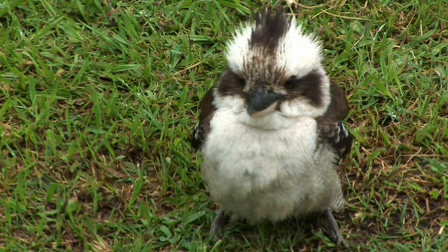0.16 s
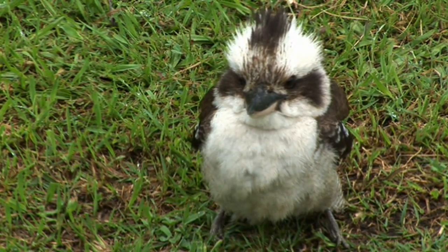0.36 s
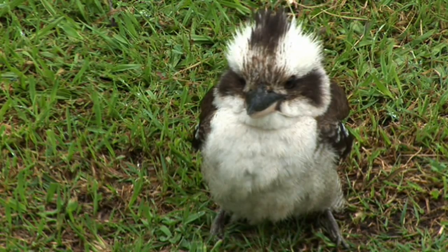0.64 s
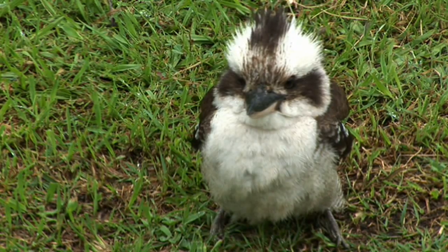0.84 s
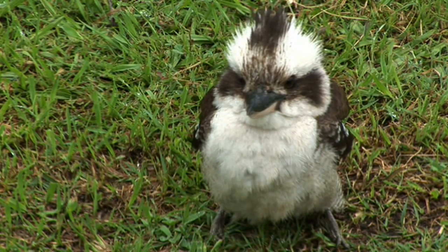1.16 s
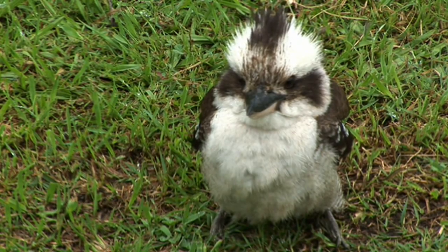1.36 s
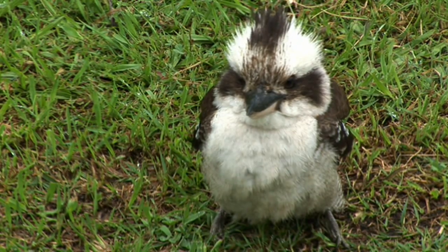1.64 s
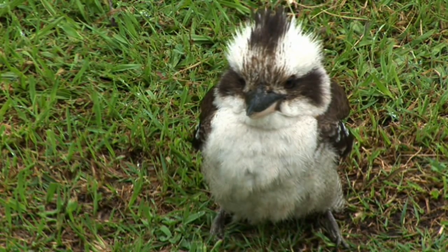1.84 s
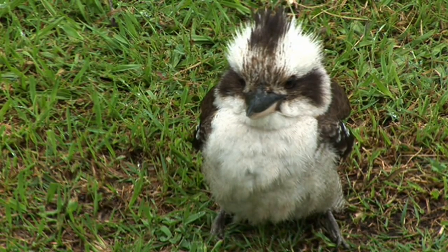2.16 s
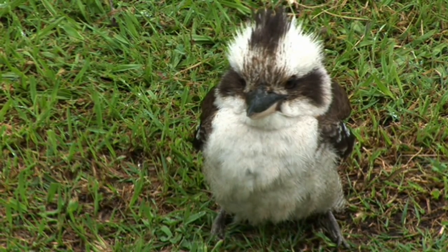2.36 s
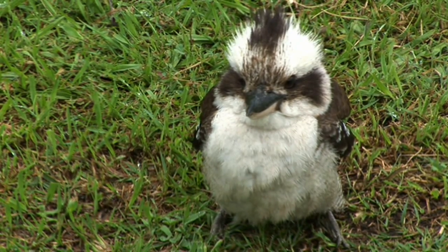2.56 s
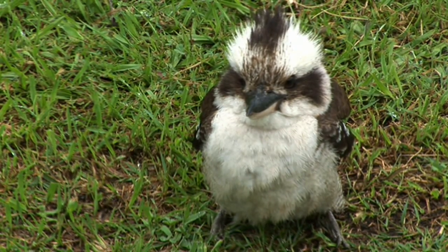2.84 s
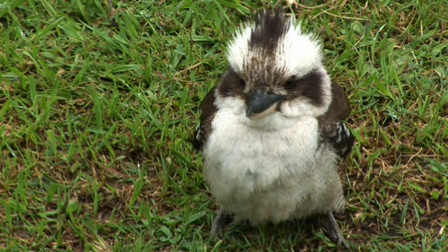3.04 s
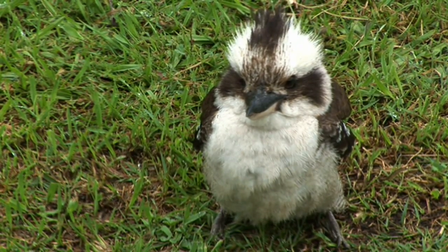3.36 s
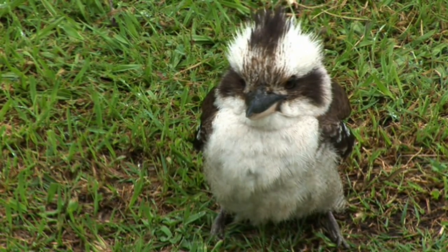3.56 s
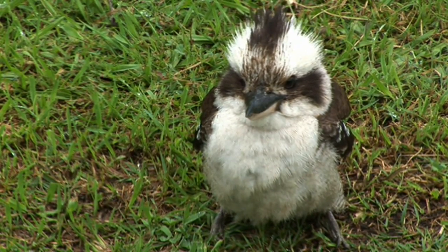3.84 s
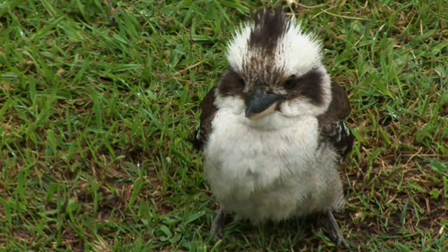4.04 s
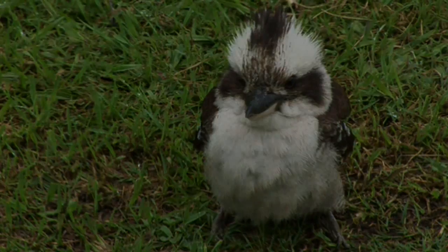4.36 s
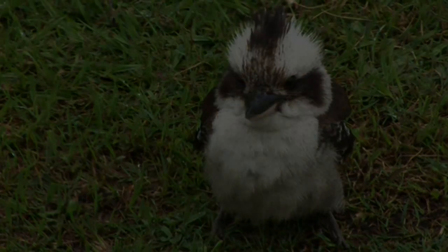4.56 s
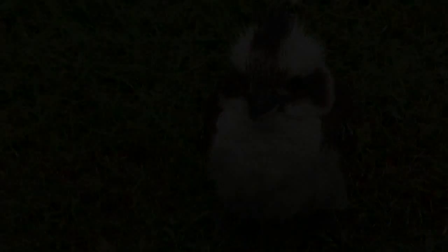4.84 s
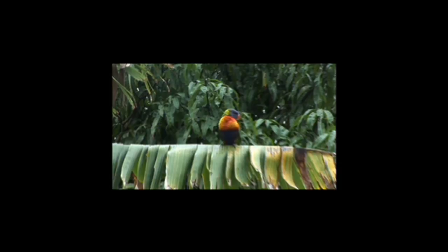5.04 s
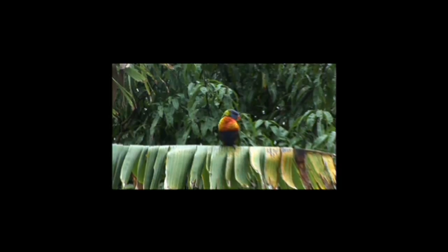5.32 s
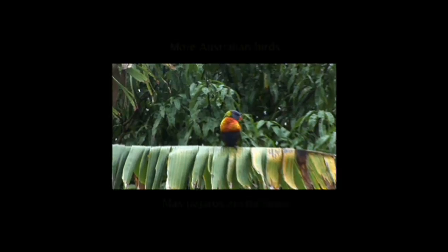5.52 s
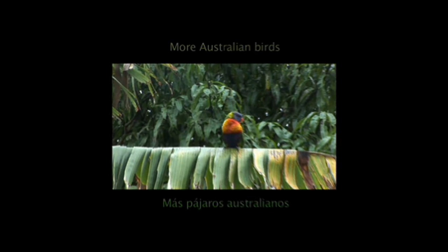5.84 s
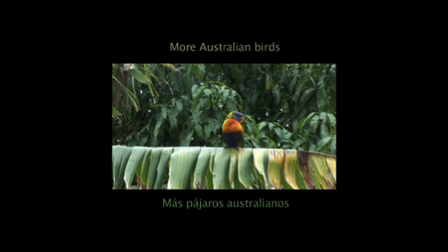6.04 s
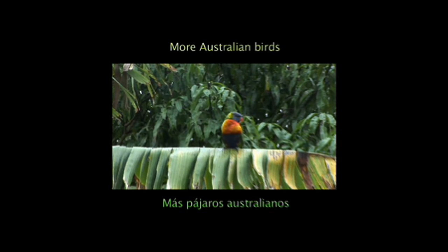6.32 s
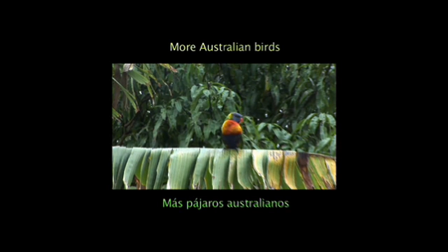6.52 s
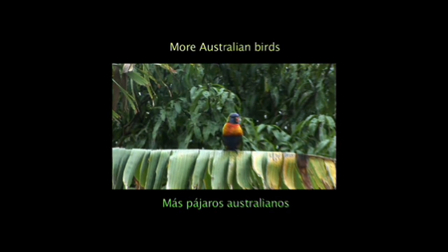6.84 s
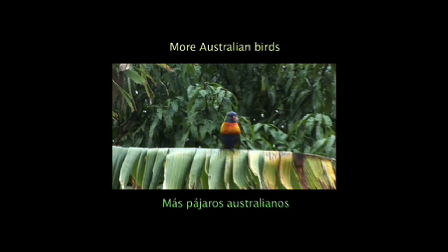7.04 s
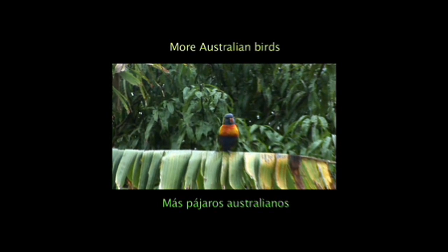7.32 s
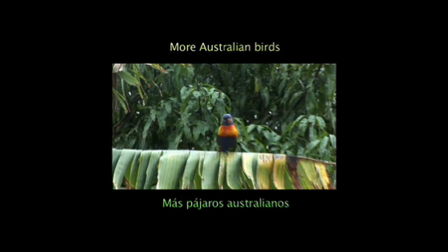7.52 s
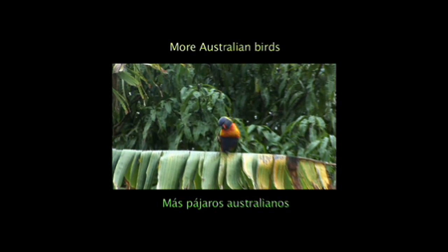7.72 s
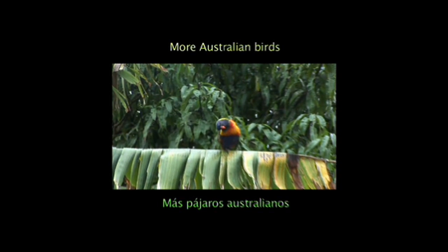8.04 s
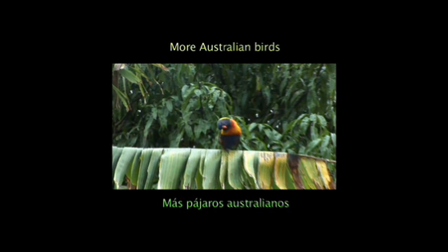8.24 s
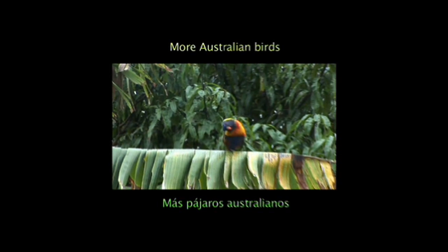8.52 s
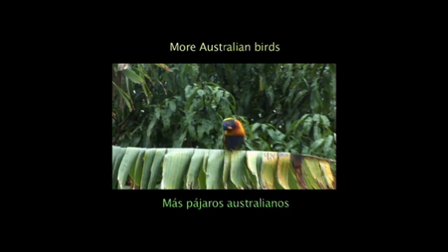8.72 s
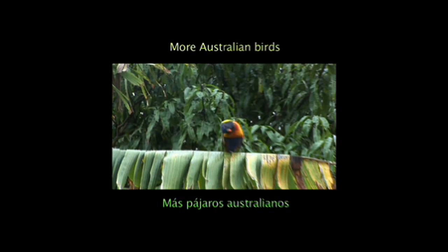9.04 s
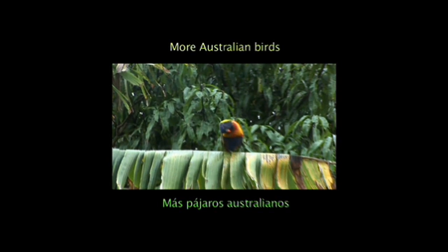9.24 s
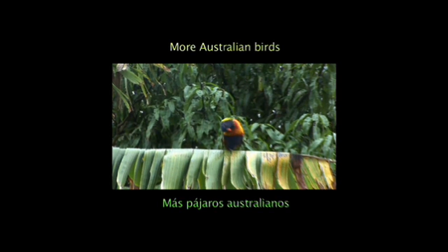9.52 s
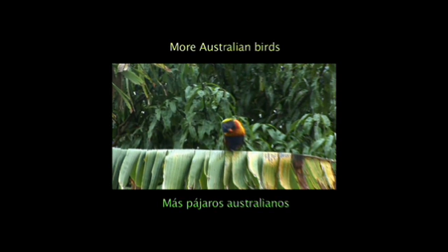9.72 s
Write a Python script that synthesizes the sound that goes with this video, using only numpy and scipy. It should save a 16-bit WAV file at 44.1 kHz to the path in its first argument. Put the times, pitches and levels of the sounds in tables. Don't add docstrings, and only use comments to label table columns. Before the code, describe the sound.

Outdoors on a lawn, small songbirds chip, peep and whistle in distant, echoing trees over a soft traffic hum. At about five seconds the place switches abruptly to a louder garden, where small parrots chatter and screech close to the microphone. Other birds whistle beyond, a crow caws far off, wings flutter past near nine seconds, and piercing cries finish it.

```python
import sys
import numpy as np
from scipy import signal
from scipy.io import wavfile
from scipy.ndimage import uniform_filter1d

SR = 44100
rng = np.random.default_rng(int(sys.argv[2]) if len(sys.argv) > 2 else 0)


def to_wav(s):
    ch = np.atleast_2d(s).T
    pcm = np.round(np.clip(ch, -1, 1) * 32767)
    wavfile.write(sys.argv[1], SR, pcm.astype(np.int16))


def level_to_linear(level):
    exponent = np.asarray(level, float) / 20
    return 10 ** exponent


N = 435708
SCENE_CHANGE_S = 4.984

# frequency in Hz, density in dB per Hz.
LAWN_AIR = [(12, -46), (20, -19), (93, -3), (373, -20), (566, -17), (688, -19), (989, -13.5), (1140, -8),
            (1460, -19.5), (2350, -14.5), (2850, -16), (3980, -21), (6220, -35.5), (14300, -35.5),
            (15600, -41)]
GARDEN_AIR = [(12, -44), (20, 4), (93, 1), (171, -1), (616, -20), (1270, -11.5), (1980, -19), (2350, -11),
              (2700, -13.5), (3280, -12.5), (4580, -24), (4980, -19), (6950, -37.5), (14300, -36),
              (15600, -40)]
# frequency in Hz, width in Hz, level in dB.
LAWN_HUMS = [(92.5, 28, -50), (147.5, 17.5, -62), (570, 19, -68), (1146, 82, -61)]
GARDEN_HUMS = [(98, 19.4, -46), (154.6, 17.5, -53)]
# frequency in Hz, 60 dB decay time in seconds.
TREE_DECAY = [(500, 0.33), (3000, 0.46), (6000, 0.51), (12000, 0.44)]

UPPER_PARTIALS_DB = [-11.5, -17, -33]
# frequency in Hz, gain in dB.
UPPER_COLOUR = [(5000, -5), (7600, -24), (10500, -2), (13500, 3)]

# start in seconds, top in Hz, held pitch in Hz, level in dB.
CHIP_CALLS = [(.18, 5070, 4130, -59.5), (.255, 5200, 3490, -58.5), (.495, 5350, 4050, -54.5),
              (.735, 5620, 3870, -52), (1.415, 5100, 3960, -51), (1.86, 4700, 3890, -52),
              (2.325, 4500, 3540, -51.5), (2.885, 5280, 3870, -56), (3.315, 4420, 3326, -52.5),
              (3.54, 5040, 3340, -53), (4.055, 4590, 3363, -53.5), (4.31, 4770, 3580, -54),
              (4.775, 5230, 3830, -53.5)]
# start in seconds, top in Hz, bottom in Hz, level in dB.
BARE_CHIPS = [(.455, 6100, 4700, -62), (1.165, 5350, 3000, -55), (1.66, 5400, 3420, -55),
              (2.05, 4400, 3110, -52), (3.091, 5280, 3520, -56.5), (3.361, 4630, 3720, -50),
              (3.869, 4920, 3260, -57), (4.295, 5880, 4640, -58.5), (4.4, 4500, 3650, -52)]
# start in seconds, length in seconds, pitch in Hz, level in dB.
PEEPS = [(.46, 0.034, 4230, -57), (.81, .11, 4200, -50), (.9, .13, 4110, -58), (.94, 0.062, 4580, -62),
         (.96, .094, 3950, -56.5), (1.41, 0.039, 5000, -55), (1.47, 0.11, 4240, -56),
         (1.55, 0.053, 3994, -49.5), (1.66, 0.05, 5170, -60), (1.73, 0.04, 3990, -48),
         (1.85, 0.034, 4670, -57), (2.03, 0.034, 4810, -57), (2.12, 0.052, 3780, -55.5),
         (2.31, 0.053, 5090, -55), (2.4, 0.096, 3805, -52.5), (2.47, .098, 4375, -55),
         (3.14, 0.064, 4170, -61), (3.87, 0.038, 4900, -60), (3.58, .095, 4140, -58),
         (3.93, 0.049, 4050, -54.5), (4.87, 0.087, 3990, -53), (3.4, .03, 3980, -51), (3.33, .1, 4300, -58),
         (4.42, .06, 4000, -55), (3.66, .08, 3400, -56), (.75, .03, 3900, -52)]
# start in seconds, length in seconds, pitch in Hz, level in dB.
LAWN_HELD = [(0, 0.027, 2964, -50.5), (.54, .09, 3020, -57), (.63, .1, 3010, -50), (.47, .04, 2480, -59),
             (.74, .05, 2450, -59), (2.235, .03, 2020, -53), (2.42, .02, 2300, -55), (4.53, .04, 2720, -57),
             (4.28, .02, 2500, -55), (.56, .12, 3230, -60), (.62, 0.045, 2470, -58),
             (.89, 0.044, 2495, -57.5), (1, 0.037, 1673, -58.5), (1.03, .044, 2440, -57.5),
             (1.13, 0.4, 2090, -62), (1.57, 0.3, 1732, -59), (1.66, 0.047, 1295, -51),
             (1.62, 0.29, 877, -57.5), (2.25, 0.021, 2647, -49.5), (2.36, 0.046, 1436, -51.5),
             (2.49, 0.14, 3125, -48), (3.78, 0.027, 3125, -54), (3.97, 0.07, 2335, -58.5),
             (4.08, 0.073, 2515, -55), (4.48, 0.022, 1594, -52.5), (4.605, .02, 3050, -51),
             (4.641, .04, 3080, -48), (4.7, .015, 3050, -48), (4.87, 0.074, 1615, -51)]
# start in seconds, length
# in seconds, first pitch in Hz, level in dB.
LAWN_DROOPS = [
    (1.5, 0.79, 2077, -60),
    (1.8, 0.35, 1420, -58.5),
    (2.25, 0.415, 847, -59.5),
    (2.26, 0.23, 1700, -54),
]
# start in seconds, length in seconds, top in Hz, level in dB.
LAWN_SWOOPS = [(.55, 0.08, 2490, -58), (2.39, .034, 3100, -57), (2.55, .11, 3096, -47.5),
               (2.94, .022, 3000, -47.5), (3.08, .022, 2900, -50.5), (3.44, 0.063, 2400, -59.5),
               (3.63, 0.096, 2784, -56.5), (4.7, 0.11, 3000, -46)]

# start in seconds, length in seconds, pitch in Hz, level in dB.
GARDEN_HELD = [(5.245, .045, 1420, -51), (5.32, .035, 1500, -51), (5.03, .17, 590, -55),
               (7.02, .2, 760, -58), (5.75, 0.012, 1460, -43.5), (7.01, 0.045, 1960, -42),
               (7.06, .07, 1950, -49), (7.16, 0.028, 1470, -46), (6.4, .025, 1660, -47),
               (6.8, .06, 3180, -52), (7.075, .012, 1400, -45), (8.41, .04, 1690, -49),
               (6.21, .035, 1500, -48), (7.2, 0.076, 1966, -43.5), (7.85, .2, 1292, -49.5),
               (8.54, 0.074, 1370, -48.5), (8.75, 0.085, 1410, -48.5), (9.37, .025, 3230, -47),
               (9.45, .04, 4270, -50)]
# time in seconds, pitch in Hz, level in dB.
GARDEN_SLIDES = [
    [(5, 1230, -52), (5.1, 1240, -53), (5.15, 1300, -49), (5.19, 1450, -52)],
    [(9.41, 1680, -48), (9.435, 1800, -50), (9.465, 2060, -48)],
    [(8.84, 1330, -54), (8.9, 1160, -54)],
]
# start in seconds, length in seconds, top in Hz, level in dB.
GARDEN_SWOOPS = [(8.15, .053, 2650, -45), (8.7, .076, 2600, -52.5), (8.96, .089, 2550, -43.5),
                 (9.49, .075, 2450, -41.5)]
# time in seconds, pitch in Hz, level in dB.
CROW_CURVE = [
    (7.38, 719, -50.5),
    (7.622, 708, -50),
    (7.649, 674, -49.5),
    (7.8, 730, -46.5),
    (7.978, 715.3, -50.5),
    (8.52, 634.4, -53.5),
]
CROW_PARTIALS_DB = [-3.5, 4, 5]

# start in seconds, hiss in dB, thump in dB against the hiss, rise in seconds.
FLAPS = [(4.9189, -47.5, 15, 0.018), (8.8925, -35, -1, 0.011), (8.9518, -33, 5.5, 0.014),
         (9.0166, -33.5, -1, 0.017), (9.0843, -38.5, 8.5, 0.014), (9.1544, -47.5, 14.5, 0.013),
         (8.82, -44, -9, .006), (8.85, -45, -9, .006), (8.878, -43, -9, .004), (8.94, -41, -9, .003),
         (9.074, -39, -9, .003), (9.115, -44, -9, .02)]

# start in seconds, length in seconds, first pitch in Hz, level in dB.
CONTACT_CALLS = [
    (5.504, 0.047, 2226, -38.5),
    (6.009, .06, 2050, -30.5),
    (6.662, 0.044, 2350, -36.5),
    (9.058, .048, 2100, -35),
]
# start in seconds, length in seconds, first pitch in Hz, level in dB,
# second partial against the first in dB.
PARROT_SLURS = [(5.065, .022, 2530, -36.5, -9), (5.25, .04, 2850, -42, -25), (5.745, .018, 2650, -44, -24),
                (5.838, .01, 3050, -40, -14), (6.382, 0.058, 2566, -36.5, -23),
                (6.618, 0.026, 2374, -37.5, -21), (6.85, 0.02, 4300, -47, -36),
                (7.734, .015, 4400, -43, -23), (8.342, .012, 4230, -44, -36), (9.58, .008, 3400, -33, -20),
                (9.553, .018, 1800, -43, -30)]
PARROT_LEAPS = [(7.365, 0.024, 2450, -35, -27)]
PARROT_DIPS = [(9.39, .022, 2900, -43, -30), (8.352, .02, 4400, -50, -30), (5.48, 0.026, 2800, -53, -30)]
PARROT_HELD = [(5.015, .05, 2460, -36.5, -14), (5.1, .1, 2480, -43.5, -28), (5.545, 0.04, 3640, -42, -19),
               (5, .015, 3300, -44, -30), (5.795, 0.043, 2710, -34, -25), (6.068, 0.021, 4830, -28.5, -26),
               (6.066, .014, 3320, -31, -15), (6.34, 0.06, 2330, -42, -21), (6.48, 0.03, 3190, -44, -32),
               (6.513, .017, 3170, -37, -32), (5.772, .022, 2350, -34, -34), (5.85, .045, 3750, -47, -24),
               (6.703, .01, 3800, -35, -15), (6.675, .02, 3820, -47, -30), (8.37, .08, 2400, -47, -20),
               (9.31, .03, 3930, -44, -30), (9.625, .028, 2400, -33, -30), (9.572, .02, 3700, -42, -15),
               (7.355, .012, 2450, -36, -25), (7.66, .045, 2900, -45, -13), (7.86, 0.037, 3530, -40.5, -30),
               (7.935, .022, 2176, -32, -30), (9.6, 0.034, 3920, -37, -30), (9.7, 0.049, 4120, -30.5, -24),
               (9.74, 0.018, 3430, -30, -20.5)]
# start in seconds, length in seconds, first pitch in Hz,
# level in dB, second partial against the first in dB.
SQUAWKS = [(5.025, 0.041, 4410, -42.5, -20), (5.15, 0.075, 5210, -46.5, -20), (6.43, 0.03, 2413, -39.5, 1),
           (6.52, 0.031, 2430, -36, -5.5), (6.9, 0.076, 3520, -53, -35), (6.9, .08, 1780, -44, -15),
           (6.9, .04, 2200, -47, -20), (6.95, .03, 2150, -43, -20), (5.255, .06, 3600, -48, -25),
           (5.63, .07, 4080, -48, -30), (5.27, .07, 2830, -48, -25), (6.53, .07, 5000, -45, -30),
           (6.75, .1, 2650, -50, -25), (6.725, .15, 1650, -44, -35), (6.725, .14, 1440, -46, -35),
           (7.25, .12, 1900, -46, -30), (7.01, .17, 980, -56, -4), (8.36, .06, 3900, -52, -30),
           (8.56, .04, 4100, -51, -30), (9.4, .07, 3500, -49, -30), (9.18, .015, 5000, -45, -30),
           (7.81, .08, 5150, -45, -30), (7.18, 0.21, 2443, -41, -15), (7.25, 0.13, 900, -54, 5),
           (7.82, 0.094, 2790, -31.5, -18), (7.965, 0.028, 2560, -30, -19), (8.02, .05, 2638, -33.5, -19),
           (8.99, .06, 2800, -41, -20), (9.25, 0.07, 2050, -47, -12), (9.11, 0.099, 4550, -46, -33),
           (9.3, 0.07, 2700, -44, -13), (9.335, 0.05, 4150, -42, -32)]
RISING_SQUAWKS = [(5.61, .075, 1850, -44, -10), (7.22, 0.07, 2200, -36, -15), (8, .07, 3360, -43, -27),
                  (8.53, 0.074, 2430, -41, -6)]
# start in seconds, length in seconds, pitch in Hz, level in dB.
PARROT_SHRILL = [(8.42, .02, 2480, -53), (8.445, 0.132, 2412, -47), (8.46, 0.065, 2853, -54),
                 (8.55, 0.068, 3030, -57)]
# time in seconds, pitch in Hz, level in dB.
SHRILL_CRIES = [
    [(5, 2760, -46), (5.014, 2600, -40), (5.035, 2640, -47)],
    [(5.055, 2850, -46), (5.075, 2900, -49), (5.12, 3030, -49), (5.155, 2930, -49), (5.185, 3070, -48),
     (5.23, 3050, -56)],
    [(6.415, 2930, -57), (6.445, 2950, -60), (6.462, 2900, -50), (6.485, 2920, -58), (6.56, 2900, -60)],
    [(6.41, 2520, -56), (6.435, 2440, -52), (6.45, 2370, -46), (6.475, 2380, -58), (6.5, 2410, -46),
     (6.525, 2470, -46), (6.535, 2400, -48)],
    [(6.545, 3030, -53), (6.575, 3100, -54), (6.6, 3090, -61), (6.66, 3080, -62)],
]
# time in seconds, pitch in Hz, level in dB.
CRIES = [
    [(5.107, 2820, -43), (5.21, 2870, -36.5), (5.262, 3420, -36)],
    [(5.872, 3290, -35), (5.886, 2654, -35), (5.9, 2760, -33), (5.92, 3230, -28.5), (5.945, 3130, -32.5),
     (6.03, 3550, -30)],
    [(7.699, 2316, -26), (7.722, 2750, -26.5), (7.755, 2480, -20.5), (7.78, 2347, -21.5),
     (7.815, 2740, -24.5)],
    [(8.055, 2557, -29), (8.08, 3090, -30.5), (8.115, 3030, -26), (8.135, 3100, -29), (8.155, 3450, -32)],
    [(8.165, 3280, -33), (8.2, 3520, -36)],
    [(7.792, 4900, -40), (7.81, 5300, -35)],
    [(7.878, 3320, -31), (7.903, 3200, -23), (7.93, 2980, -29), (7.95, 3220, -32)],
    [(9.593, 2456, -17), (9.598, 3000, -19.5), (9.606, 2683, -20), (9.63, 2930, -17.5),
     (9.654, 3080, -16.5)],
    [(9.593, 4900, -29), (9.598, 6000, -33), (9.606, 5370, -29), (9.63, 5860, -32), (9.654, 6160, -35)],
    [(9.657, 4126, -27), (9.693, 4146, -20)],
    [(9.696, 3150, -16), (9.733, 3360, -22.5)],
]
CRY_SECOND_DB = [-24, -29, -27, -25, -27, -29, -23, -19, -45, -27, -25]

PEEP_SAG, HELD_SAG, FAR_HELD_SAG, DROOP, SWOOP = 0.95, 0.988, 0.97, .935, .61
SLUR, LEAP, DIP, CREEP = 1.17, 1.75, .89, 1.025


def evened(x):
    return x / np.sqrt(np.mean(x ** 2) + 1e-20)


def read(points, hz):
    f, value = np.transpose(points)
    return np.interp(np.log(hz + 1), np.log(f + 1), value)


def add(mix, s, sound):
    part = mix[round(s * SR):][:len(sound)]
    part += sound[:len(part)]


def smooth_noise(count, size):
    once = uniform_filter1d(rng.standard_normal((2, count)), size=size)
    return evened(uniform_filter1d(once, size=size))


def band(hz, width, count):
    r = np.exp(-np.pi * width / SR)
    noise = rng.standard_normal(count) + 1j * rng.standard_normal(count)
    slow = signal.lfilter([1], [1, -2 * r, r * r], noise)
    carrier = np.exp(2j * np.pi * hz * np.arange(count) / SR)
    return evened((slow * carrier).real)


def echo(x, wet_db, stretch):
    taps = np.zeros(SR)
    at = np.arange(160, SR - 20, 20)
    taps[at + rng.integers(0, 20, len(at))] = rng.choice([-1., 1.], len(at))
    hz, t, z = signal.stft(taps, SR, nperseg=256)
    t60 = stretch * read(TREE_DECAY, hz)[:, None]
    tail = signal.istft(z * level_to_linear(-60 * t / t60), SR, nperseg=256)[1]
    return x + level_to_linear(wet_db) * signal.fftconvolve(x, tail / np.linalg.norm(tail))[:N]


def whistles(notes, warble, flutter_db, rasp, hoarse, edge_s):
    out = np.zeros(N)
    chance = rng.random((len(notes), 2, 2, 8))
    grit = smooth_noise(N + SR, 40)
    for (points, *second_db), draw in zip(notes, chance):
        at, pitch_hz, level_db = np.transpose(points)
        s, length = at[0], at[-1] - at[0]
        t = np.arange(round((length + edge_s) * SR)) / SR
        clock = s - edge_s / 2 + t
        rate_hz, phase = 25 * 9 ** draw[:, 0, :, None], draw[:, 1, :, None]
        waver, shake = np.sin(2 * np.pi * (rate_hz * t + phase)).sum(1) / 2
        jitter, shimmer = grit[:, round(s * SR):][:, :len(t)]
        db = np.interp(clock, at, level_db) + flutter_db * shake
        hz = np.interp(clock, at, pitch_hz) * (1 + warble * waver + hoarse * jitter)
        turn = 2 * np.pi * np.cumsum(hz) / SR
        tone = np.sin(turn)
        if second_db:
            tone += level_to_linear(second_db[0]) * np.sin(2 * turn)
            onset = np.minimum(t / .006, 1)
            for k, part_db in enumerate(UPPER_PARTIALS_DB, 3):
                gain = level_to_linear(0.66 * second_db[0] + part_db + read(UPPER_COLOUR, k * hz))
                gain = gain * (k * hz < SR / 2) * onset
                come_and_go = 1 + 1.04 * np.roll(jitter, 90 * k)
                tone += gain * np.sin(k * turn) * come_and_go
        fade = np.clip(np.minimum(t, t[-1] - t) / edge_s, 0, 1)
        note = np.sqrt(2) * level_to_linear(db) * tone * (1 + rasp * shimmer) * fade
        add(out, max(s - edge_s / 2, 0), note)
    return out


def glides(rows, ratio, *second_db):
    return [([(s, hz, db), (s + length, hz * ratio, db)], *rest, *second_db)
            for s, length, hz, db, *rest in rows]


def air(colour, db, hums, patchy_db):
    frames, hz = N // 256 + 5, np.fft.rfftfreq(1024, 1 / SR)
    a, b, patches = rng.standard_normal((frames, 513, 3)).T
    patches = uniform_filter1d(patches, size=14, axis=0)
    patches = evened(uniform_filter1d(patches, size=16, axis=1))
    z = (a + 1j * b) * level_to_linear(read(colour, hz)[:, None] + patchy_db * patches)
    wash = signal.istft(z, nperseg=1024, noverlap=768)[1][:N]
    machines = sum(level_to_linear(hum_db) * band(f, width, N) for f, width, hum_db in hums)
    return level_to_linear(db) * evened(wash) + machines


def chip_calls():
    chip_s, hold_s = .027, 0.0633
    calls = [([(s, top_hz, db), (s + chip_s, hz, db)],) for s, top_hz, hz, db in BARE_CHIPS]
    for s, top_hz, hz, db in CHIP_CALLS:
        landing = s + chip_s
        calls.append(([(s, top_hz, db - 6.5), (landing, hz, db), (landing + hold_s, 0.99 * hz, db)],))
    return calls


def songbirds():
    small = chip_calls() + glides(PEEPS, PEEP_SAG)
    large = glides(LAWN_HELD, HELD_SAG) + glides(LAWN_DROOPS, DROOP) + glides(LAWN_SWOOPS, SWOOP)
    chirps = whistles(small, warble=.012, flutter_db=3, rasp=.3, hoarse=.009, edge_s=.012)
    pure = whistles(large, warble=.004, flutter_db=3, rasp=.1, hoarse=.0015, edge_s=.012)
    return level_to_linear(-2) * echo(chirps, wet_db=9, stretch=1) + echo(pure, wet_db=3, stretch=1.2)


def crow():
    s, hz, db = np.transpose(CROW_CURVE)
    t, out = np.arange(s[0], s[-1], 1 / SR), np.zeros(N)
    waver, shake = smooth_noise(len(t), 500)
    turn = 2 * np.pi * np.cumsum(np.interp(t, s, hz) * (1 + 0.0096 * waver)) / SR
    stack = sum(level_to_linear(part_db) * np.sin(k * turn) for k, part_db in enumerate(CROW_PARTIALS_DB, 1))
    level = level_to_linear(np.interp(t, s, db) + 1.5 * shake)
    add(out, s[0], level * stack * signal.windows.tukey(len(t), .08))
    return out


def far_birds():
    notes = glides(GARDEN_HELD, FAR_HELD_SAG) + glides(GARDEN_SWOOPS, SWOOP) + list(zip(GARDEN_SLIDES))
    far = whistles(notes, warble=.01, flutter_db=4, rasp=.2, hoarse=.003, edge_s=.012)
    return echo(far + crow(), wet_db=0, stretch=1.2)


def wings():
    out, t = np.zeros(N), np.arange(2600) / SR
    for s, db, thump_db, rise_s in FLAPS:
        puff = (t / rise_s * np.exp(1 - t / rise_s)) ** 2
        hiss = level_to_linear(-6.0) * rng.standard_normal(len(t))
        hiss += level_to_linear(10.0) * band(1500, 3000, len(t))
        hiss += level_to_linear(1.0) * band(13000, 4500, len(t))
        thump = level_to_linear(thump_db) * band(641.4, 240, len(t))
        add(out, s - .008, level_to_linear(db - 11.5) * puff * (hiss + thump))
    return echo(out, wet_db=-8.5, stretch=1.0)


def contact_calls():
    start_db, second_db = -10, -7.5
    return [([(s, hz, db + start_db), (s + 0.68 * length, 1.29 * hz, db + start_db / 2),
              (s + length, 1.64 * hz, db)], second_db) for s, length, hz, db in CONTACT_CALLS]


def shrill_notes():
    octave_db, thin_db = 7, 9
    cries = [(np.subtract(cry, [0, 0, thin_db]), octave_db + thin_db) for cry in SHRILL_CRIES]
    return glides(PARROT_SHRILL, CREEP, octave_db) + cries


def parrots():
    clear = contact_calls() + glides(PARROT_SLURS, SLUR) + glides(PARROT_LEAPS, LEAP)
    clear += glides(PARROT_DIPS, DIP) + glides(PARROT_HELD, CREEP) + shrill_notes()
    rough = glides(SQUAWKS, CREEP) + glides(RISING_SQUAWKS, SLUR)
    cries = list(zip(CRIES, CRY_SECOND_DB))
    flock = whistles(clear, warble=.007, flutter_db=2.5, rasp=.1, hoarse=.003, edge_s=.005)
    flock += whistles(rough, warble=.03, flutter_db=3.5, rasp=.3, hoarse=.014, edge_s=.008)
    near = whistles(cries, warble=.007, flutter_db=2.2, rasp=.14, hoarse=.003, edge_s=.003)
    return echo(flock, wet_db=-2, stretch=1.2) + echo(near, wet_db=-6, stretch=1.2)


def scene():
    lawn = songbirds() + air(LAWN_AIR, -49, LAWN_HUMS, patchy_db=1.1)
    garden = air(GARDEN_AIR, -40.5, GARDEN_HUMS, patchy_db=1.5)
    garden += level_to_linear(0.6) * far_birds() + level_to_linear(2.24) * parrots()
    after = np.clip((np.arange(N) / SR - SCENE_CHANGE_S) / .002, 0, 1)
    return (lawn * (1 - after) + garden * after + wings())[None]


def roll_off(x):
    return signal.sosfilt(signal.butter(12, 15750, fs=SR, output="sos"), x)


def record(dry):
    return roll_off(dry)


dry = scene()
out = record(dry)
to_wav(out)
```